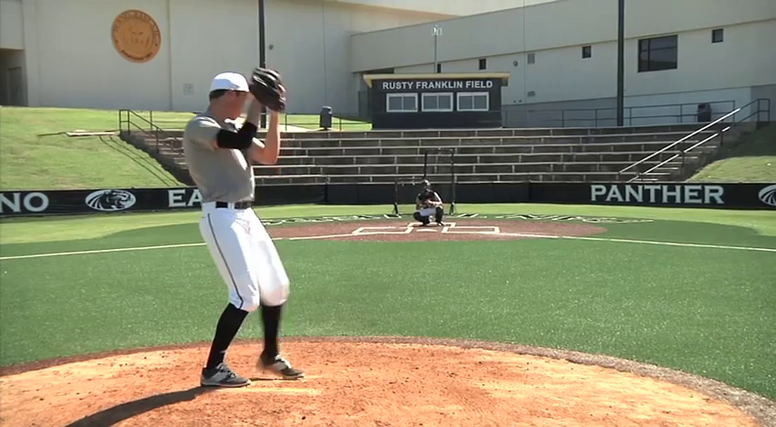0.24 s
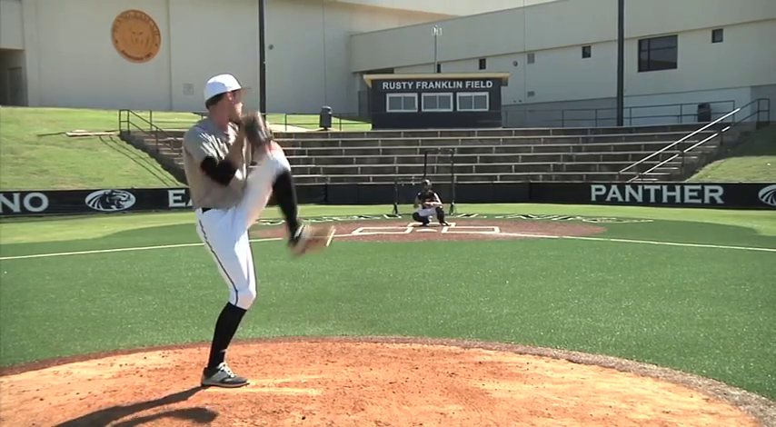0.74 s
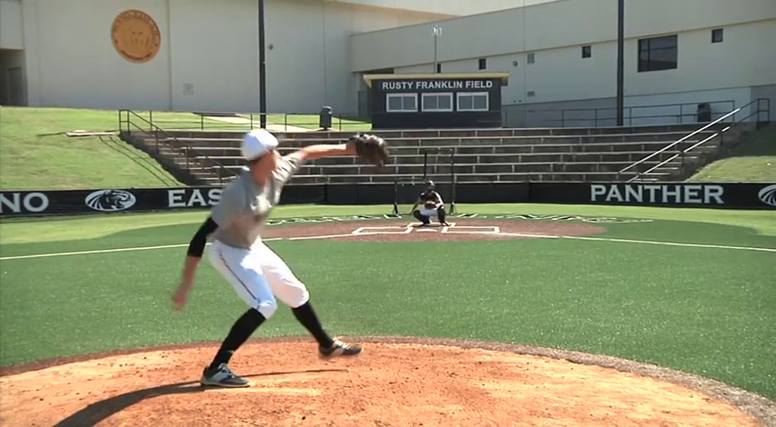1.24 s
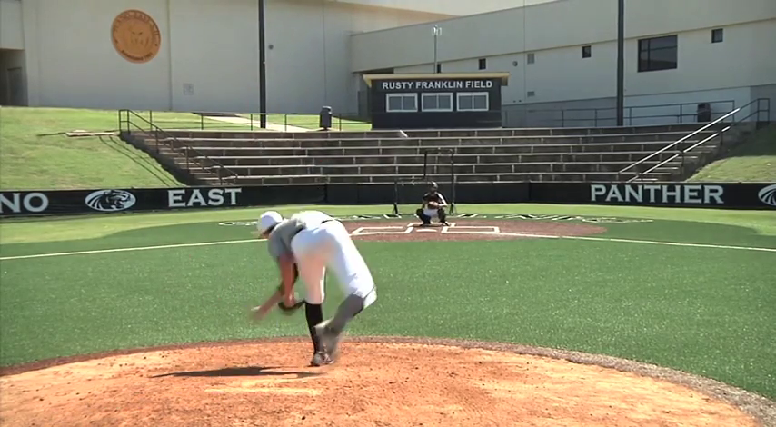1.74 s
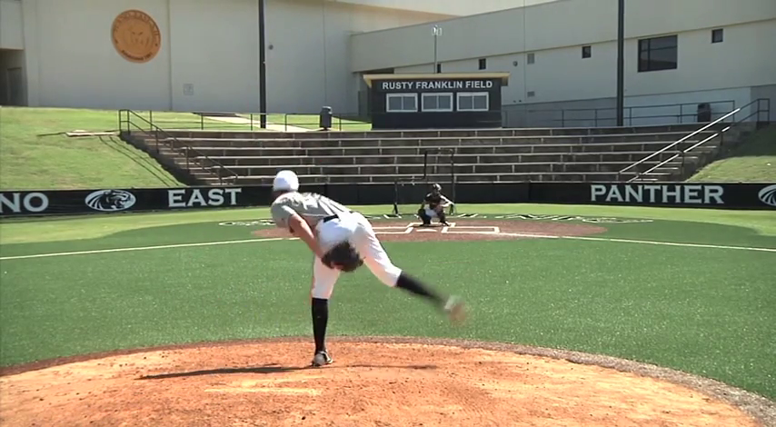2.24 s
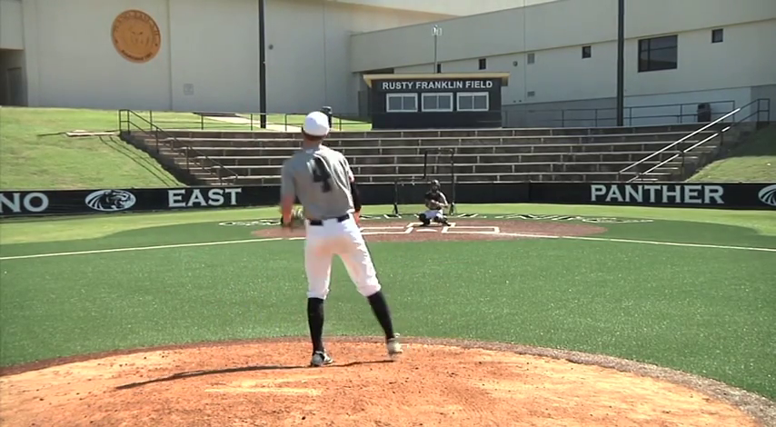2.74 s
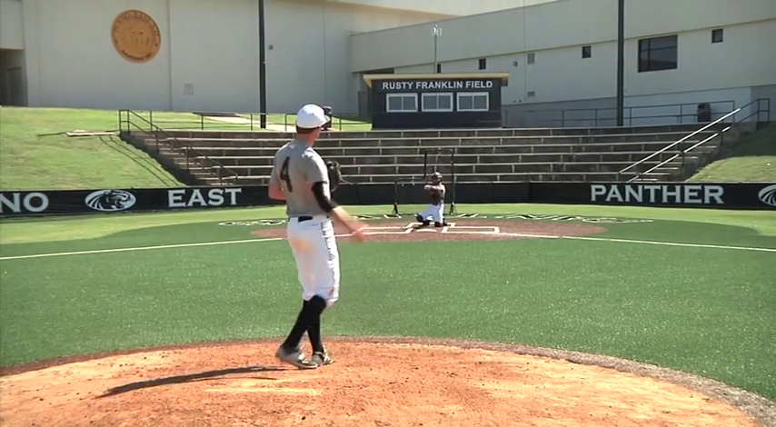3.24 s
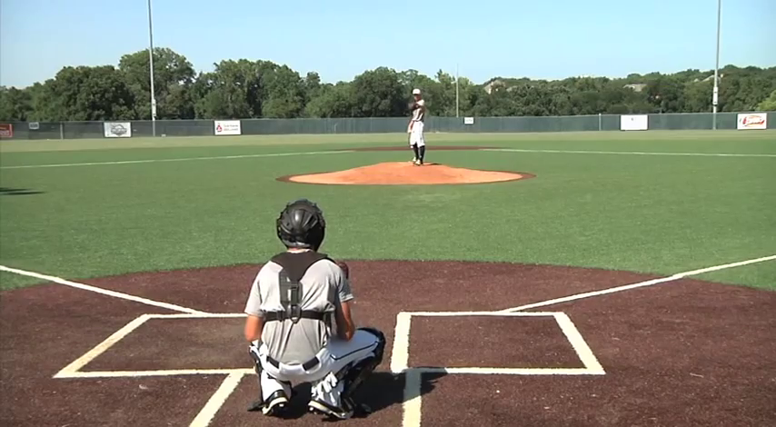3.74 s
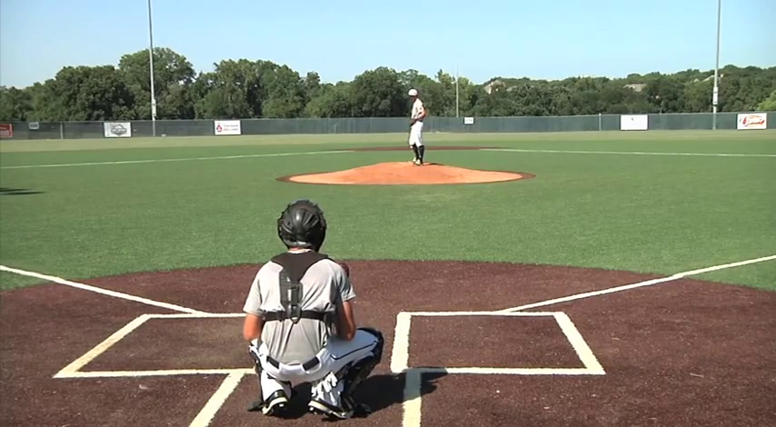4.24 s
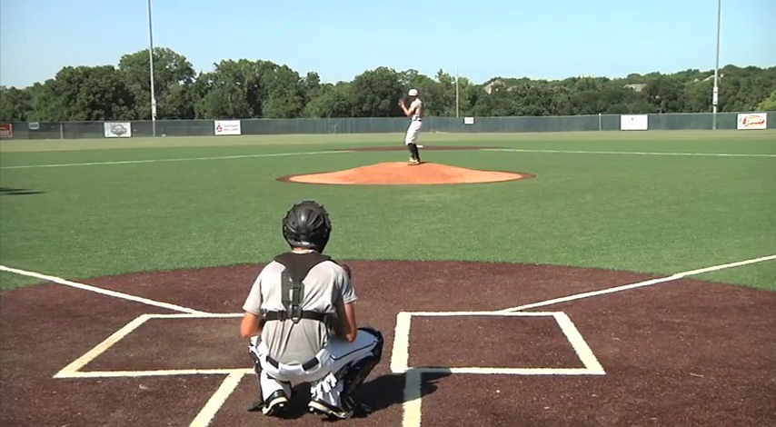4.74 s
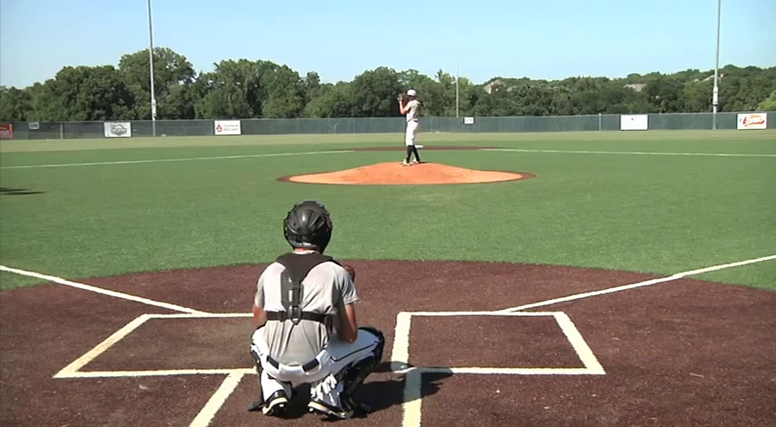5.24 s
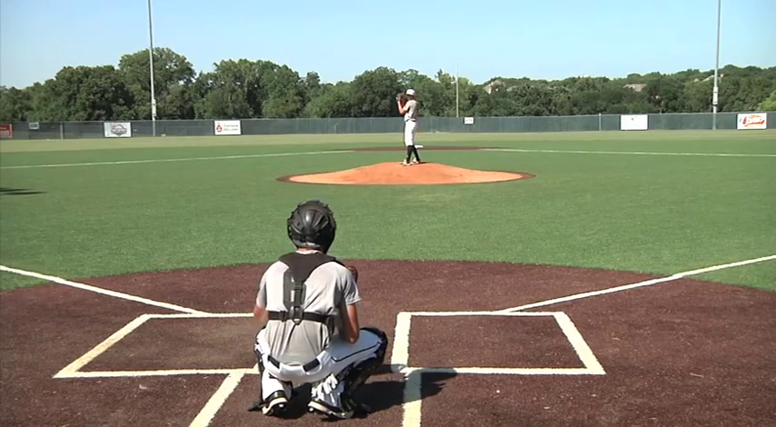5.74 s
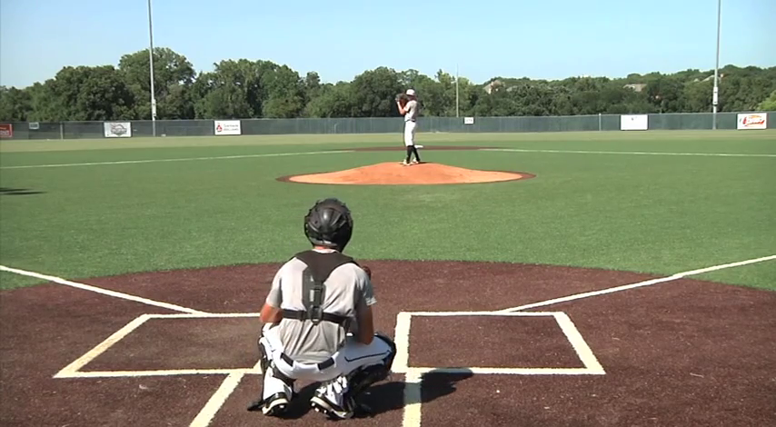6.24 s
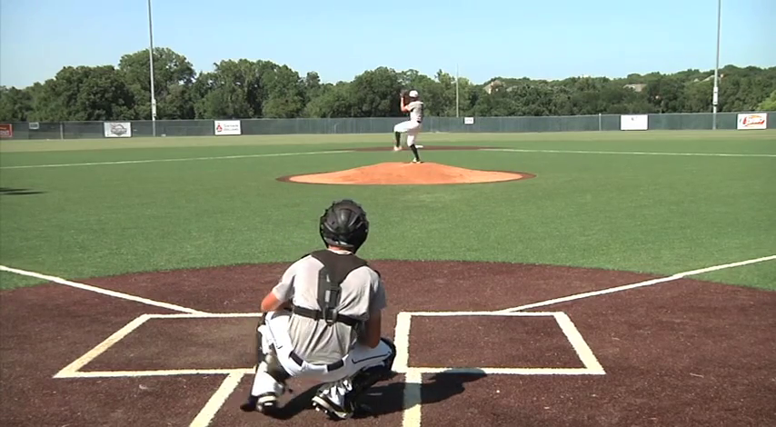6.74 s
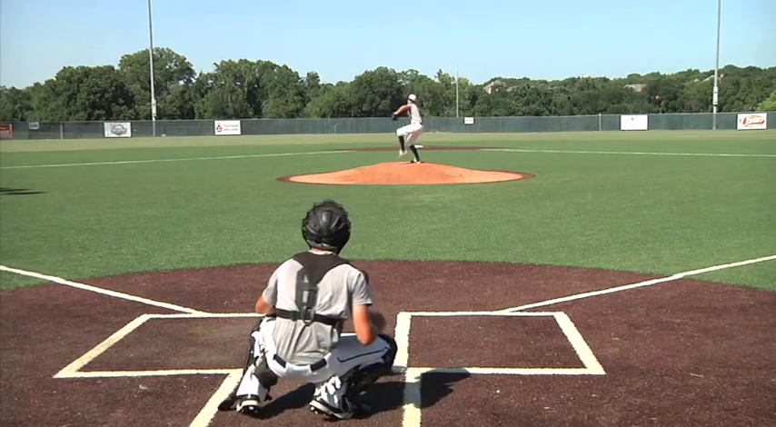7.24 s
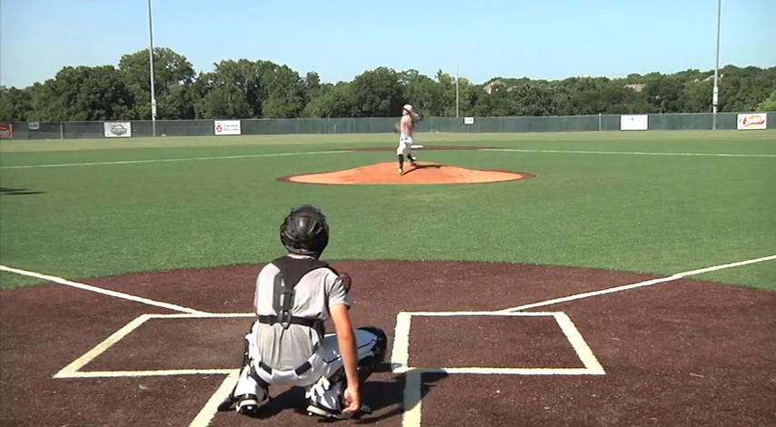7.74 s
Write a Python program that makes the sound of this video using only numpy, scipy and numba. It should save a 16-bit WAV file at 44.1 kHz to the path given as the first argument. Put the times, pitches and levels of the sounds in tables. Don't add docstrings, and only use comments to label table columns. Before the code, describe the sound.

Wind overloads a single, nearly centred microphone in dense booming buffets, with tiny ticks as its level pumps. Beneath lie far traffic, a faint fan whine and a thin insect buzz. Shoes scrape gritty dirt, a hard leathery pop rings out with short echoes, and more gusts arrive. After a sudden cut the air is quieter, a steady distant motor drone and low wind, ending with leather creaks and a rising gust.

```python
import sys
import numpy as np
from scipy import signal
from scipy.fft import rfft, irfft, next_fast_len
from scipy.io import wavfile
from scipy.ndimage import uniform_filter1d
from numba import njit

SR = 44100
rng = np.random.default_rng(int(sys.argv[2]) if len(sys.argv) > 2 else 0)


def store_wav(level_fs):
    pcm = np.round(np.clip(np.atleast_2d(level_fs), -1, 1) * 32767)
    wavfile.write(sys.argv[1], SR, pcm.T.astype(np.int16))


def ratio_of_db(decibels):
    return 10 ** (np.asarray(decibels, float) / 20)


N = 351918
CHANGE_S = 3.4427
LIMIT = .447


def evened(x):
    return x / np.sqrt(np.mean(x ** 2) + 1e-20)


def read(points, hz):
    f, value = np.transpose(points)
    return np.interp(np.log(hz + 1), np.log(f + 1), value)


def curve(rows, index):
    rows = np.array(rows)
    return np.interp(np.arange(N) / SR, rows[:, 0], rows[:, index])


def add(mix, s, sound):
    part = mix[max(round(s * SR), 0):][:len(sound)]
    part += sound[:len(part)]


def coloured(x, points):
    size = next_fast_len(len(x))
    gain = ratio_of_db(read(points, np.fft.rfftfreq(size, 1 / SR)))
    return evened(irfft(rfft(x, size) * gain, size)[:len(x)])


def drift(seconds):
    t = np.arange(0, N / SR, 1e-3)
    size = max(round(seconds * 1000), 2)
    smooth = uniform_filter1d(rng.standard_normal(len(t)), size)
    smooth = uniform_filter1d(smooth, size)
    return np.interp(np.arange(N) / SR, t, evened(smooth))


def resonate(x, hz, width):
    r = np.exp(-np.pi * width / SR)
    return 2 * signal.lfilter([1 - r], [1, -r * np.exp(2j * np.pi * hz / SR)], x).real


def slow_gain_db():
    # [t/s, gain/dB]
    slow_points = [(0.0, -8), (0.22, -10), (0.4, -8.5), (0.8, -6.5), (1.12, -12.5), (1.5, -2.5), (2.0, -4),
                   (2.5, -2), (2.95, -8.5), (3.3, -3.5), (3.43, -3.5), (3.47, 0.3), (3.9, 0.5), (5.0, 0.13),
                   (6.85, .7), (7.3, -0.95), (7.98, 1)]
    return curve(slow_points, index=1)


def wind():
    # [t/s, level/dB, brightness/dB]
    gusts = [(0.0, -14.5, -20), (0.5, -10, -28), (0.7, -12.5, -12), (1.65, -13, -10), (2.15, -14.5, -14),
             (2.3, -20.5, -26), (2.5, -12, -22), (3.0, -14, -17), (3.44, -11.5, -12), (3.85, -22, -28),
             (4.15, -15.5, -31), (4.35, -27, -16), (4.64, -13.5, -33), (4.9, -30, -15),
             (6.38, -37.5, -10.5), (6.64, -24, -10.5), (7.1, -22, -24.5), (7.8, -12, -20.5)]
    # [f/Hz, density/dB]
    turbulence = [(2.9, -37.5), (5.0, 0.5), (18, 4), (36, -3.5), (124, -18.5), (330, -43.5), (430, -63.5),
                  (730, -120)]
    # [t/s, direction +-1, peak over the limit/dB, width/ms]
    buffets = [(0.018, 1, -0.1, 12), (0.039, -1, 2.5, 19), (0.098, -1, 1, 10), (0.135, 1, 0.2, 20),
               (0.155, -1, 3, 23), (0.378, -1, 2, 14.3), (0.404, 1, 3, 9.9), (0.427, 1, 2, 13),
               (0.567, 1, 0.5, 13), (0.723, 1, 1.3, 14), (0.745, -1, 0.5, 11), (0.854, 1, 0, 7.9),
               (0.868, -1, -0.5, 13), (0.991, 1, -0.3, 12), (1.012, -1, 0.2, 12), (1.034, -1, 1.8, 6),
               (1.441, -1, -0.5, 8), (1.641, 1, -0.9, 11), (1.839, 1, 1.5, 9), (2.499, -1, 3.5, 20),
               (2.668, -1, 1.5, 13), (2.773, -1, 0.5, 17), (2.817, 1, 1.5, 10), (2.876, -1, 3, 16),
               (2.935, 1, 1.64, 14), (3.041, -1, 1.5, 12), (3.375, -1, 0.5, 8.5), (3.435, -1, -0.04, 19),
               (7.844, 1, 0.7, 17), (7.943, 1, -3, 23)]
    rumble = coloured(rng.standard_normal(N), turbulence)
    flutter = signal.sosfiltfilt(signal.butter(2, 55, "high", fs=SR, output="sos"), rumble)
    bright_db = curve(gusts, index=2) + 15
    x = rumble - flutter + flutter * ratio_of_db(bright_db + 2.3 * drift(0.045) + 1.7 * drift(0.17))
    x *= ratio_of_db(curve(gusts, index=1) - 0.3 + 1.3 * drift(0.13))
    x = .4 * np.tanh(x / .4)
    for s, way, db, ms in buffets:
        here = x[round(s * SR)]
        push = np.hanning(round(ms * SR / 600)) ** .8
        peak = np.sign(way) * LIMIT * ratio_of_db(1.3 * db + 0.48)
        add(x, s - ms / 1200, (peak - here) * push)
    return x


def hum():
    # [f/Hz, density/dB]
    mound_colour = [(120, -28), (200, -1.5), (299, -9), (529, -9.5), (935, -14.5), (1260, -17), (1960, -24),
                    (2090, -24.5), (2690, -24), (2930, -23.5), (4300, -33.5), (7110, -41), (11000, -59.5),
                    (14300, -88), (22000, -120)]
    # [f/Hz, density/dB]
    plate_colour = [(35, -47), (100, -7), (190, 2.5), (440, -3), (550, -6.5), (860, -8), (1300, -15),
                    (2100, -24), (3400, -25.5), (4300, -33.5), (5500, -39.5), (7500, -40.5), (8800, -48),
                    (10000, -55)]
    # [f/Hz, width/Hz, level/dB]
    fan_tones = [(2090, 15, -3.5), (2440, 55, -2), (3096, 23, -1.5), (3600, 30, -6)]
    # [t/s, level over the hum/dB]
    fan_swells = [(0, -23), (.3, -11.5), (.8, -22), (1.2, -49), (1.9, -15), (2.3, -13), (2.7, -20),
                  (3.4, -17)]
    # [f/Hz, width/Hz, level over the hum/dB]
    motor_tones = [(534, 1.6, -8.5), (1058, 1.5, -14)]
    # [t/s, level over the hum/dB]
    insect_swells = [(0, -45), (.2, -42), (.28, -22), (.75, -26), (.85, -42), (3.4, -38)]
    patchy = ratio_of_db(0.45 * drift(0.038))
    mound = coloured(rng.standard_normal(N), mound_colour) * ratio_of_db(3.5)
    noise = rng.standard_normal(N)
    whine = sum(ratio_of_db(db) * evened(resonate(noise, hz, width)) for hz, width, db in fan_tones)
    mound += whine * ratio_of_db(curve(fan_swells, index=1) + 1.5 * drift(.04))
    mound += sum(ratio_of_db(db) * evened(resonate(noise, hz, width)) for hz, width, db in motor_tones)
    mound += evened(resonate(noise, 3560, 45)) * ratio_of_db(curve(insect_swells, index=1))
    plate = coloured(rng.standard_normal(N), plate_colour) * ratio_of_db(3.5)
    plate += ratio_of_db(-11.5) * evened(resonate(noise, 440, 4.0))
    return ratio_of_db(-41) * patchy * np.where(np.arange(N) < CHANGE_S * SR, mound, plate)


def bird():
    # [t/s, length/s, f/Hz, level/dB]
    whistles = [
        (0.96, 0.028, 7350, -68),
        (1.1, 0.2, 6800, -75),
        (2.705, 0.32, 7030, -63.5),
    ]
    sag_hz, sag_s, fade_db = 300, .09, -8
    out, tremble = np.zeros(N), ratio_of_db(3.6 * drift(.02))
    for s, length, hz, db in whistles:
        t = np.arange(0, length, 1 / SR)
        pitch = hz - sag_hz * (1 - np.exp(-t / sag_s))
        tone = np.sqrt(2) * np.sin(2 * np.pi * np.cumsum(pitch) / SR)
        add(out, s, tone * ratio_of_db(db + fade_db * t / length) * signal.windows.tukey(len(t), .25))
    return out * tremble


def scuffs():
    # [start t/s, loudest t/s, end t/s, peak level/dB, weight of the foot/dB]
    drags = [
        (1.3, 1.4, 1.5, -49.5, 4),
        (1.5, 1.563, 1.615, -36.5, 0),
        (1.655, 1.662, 1.7, -44, -2),
        (1.67, 1.72, 1.8, -46.5, -11),
        (3.282, 3.286, 3.32, -61, 18),
        (3.3, 3.335, 3.37, -63, 24),
        (7.66, 7.76, 7.86, -58, 6),
        (7.858, 7.875, 7.9, -44, 2),
        (7.89, 7.91, 7.975, -49.5, 0),
    ]
    # [t/s, peak level/dB, f/Hz]
    crunches = [(1.408, -39, 2920), (1.511, -45, 6000), (1.518, -34, 4500), (1.538, -23, 650),
                (1.552, -25, 500), (1.549, -28, 2520), (1.661, -23.5, 600), (1.731, -34, 2500),
                (1.731, -44, 6500), (3.286, -26, 1100), (3.286, -39, 2800), (3.291, -43, 2300),
                (3.33, -26, 1100), (7.867, -40, 4950), (7.885, -26, 5900), (7.97, -39, 2500)]
    # [f/Hz, density/dB]
    sand_colour = [(710, -33), (1200, -12), (1710, 2), (2290, -0.5), (3430, -4.5), (8570, -18),
                   (12000, -34), (15600, -70), (22000, -120)]
    # [f/Hz, density/dB]
    glove_colour = [(1000, -30), (2000, -0.5), (4500, -7), (7000, -10.5), (9000, -14), (11500, -44),
                    (16000, -72)]
    swell_db, fade_db = -12.5, -8.5
    out = np.zeros(N)
    grains = ratio_of_db(1.3 * rng.exponential(1, N)) * (rng.random(N) < .03)
    sand = rng.standard_normal(N) * (1 + grains)
    dull = resonate(resonate(sand, 800, 800), 800, 800)
    for *s, db, weight_db in drags:
        level_db = [db + swell_db, db, db + fade_db]
        t = np.arange(s[0], s[-1], 1 / SR)
        at = slice(round(s[0] * SR), round(s[0] * SR) + len(t))
        grit = coloured(sand[at], sand_colour if s[0] < CHANGE_S else glove_colour)
        scrape = evened(dull[at]) * ratio_of_db(weight_db - 2.0)
        swell = ratio_of_db(np.interp(t, s, level_db) - 1.0) * signal.windows.tukey(len(t), .15)
        add(out, s[0], (grit + scrape) * swell)
    t = np.arange(600) / SR
    for s, db, hz in crunches:
        burst = rng.standard_normal(len(t)) * ratio_of_db(-60 * t / 0.02) * np.minimum(t * 1500, 1)
        ring = resonate(resonate(burst, hz, .7 * hz), hz, .7 * hz)
        add(out, s, ratio_of_db(db) * ring / abs(ring).max())
    return signal.sosfilt(signal.butter(4, 10000, fs=SR, output="sos"), out)


def mitt():
    # [f/Hz, level/dB, delay/s, length/s]
    pocket = [
        (330, 0.5, 0.00065, 0.006),
        (707, -3, 0.00018, 0.0028),
    ]
    # [t/s, crack level/dB,
    # low thump level/dB, high thump level/dB, loss of treble/dB per half octave]
    pops = [(2.2918, -24, -44, -44, -1), (2.2927, -4.5, -9, -0.5, 1.5), (2.3135, -46, -42, -51, 10),
            (2.3242, -36, -44, -44, 6), (2.329, -40, -49, -42, 1), (2.3452, -13.5, -15.5, -22, -5),
            (2.3535, -14.5, -14.5, -16.5, 1.5), (2.368, -37, -26, -46, 3), (2.386, -43, -29, -41, 10),
            (2.4101, -23.5, -32, -19.5, 6), (2.417, -27, -31, -31, 5), (2.424, -36, -32, -40, 5),
            (2.430, -31, -45, -19, 12), (2.438, -28, -41, -28, 12), (2.445, -33, -34, -32, 19),
            (2.451, -35, -22.5, -21.5, 15)]
    # [f/Hz, density/dB]
    slap_colour = [(700, -32), (1000, -29), (1400, -9), (1900, -6), (2400, -3.5), (2800, 0.5), (3250, 6.5),
                   (3900, -18.5), (4600, -7.5), (6700, -11), (8600, -12.5), (10500, -36), (15500, -37)]
    slap_ms, smear_ms_per_s = 11.7, 52
    pop_s = pops[1][0]
    out, t = np.zeros(N), np.arange(3000) / SR
    thumps = []
    for hz, db, late, length in pocket:
        wave = np.sin(2 * np.pi * hz * np.maximum(t - late, 0))
        thumps.append(ratio_of_db(db) * wave * np.exp(-(t / length) ** 4))
    low, high = thumps
    for s, crack_db, low_db, high_db, loss_db in pops:
        ms = slap_ms + smear_ms_per_s * (s - pop_s)
        knee_hz = 3600 - 120 * loss_db
        dulled = [(hz, db - loss_db * max(np.log2(hz / knee_hz), 0) * 2) for hz, db in slap_colour]
        slap = coloured(rng.standard_normal(len(t)), dulled)
        ring = signal.sosfiltfilt(signal.butter(2, 5500, fs=SR, output="sos"), slap)
        slap = ring * ratio_of_db(-60 * t / ms * 1000) + (slap - ring) * ratio_of_db(-60 * t / ms * 2200)
        onset = np.minimum(t / (0.000054 + 0.000077 * abs(loss_db)), 1)
        add(out, s, ratio_of_db(crack_db) * slap * onset + ratio_of_db(low_db) * low + ratio_of_db(high_db) * high)
    tail = np.arange(SR // 2) / SR
    field = rng.standard_normal(len(tail)) * ratio_of_db(-60 * tail / 1.4) * np.minimum(tail / 0.11, 1)
    add(out, pop_s, ratio_of_db(-52) * signal.oaconvolve(field, out[round(pop_s * SR):][:600]))
    return out


def scene():
    near = (wind() + bird() + scuffs() + mitt()) / ratio_of_db(slow_gain_db())
    return np.array([near + hum()] * 2)


@njit
def stepped_db(x, slow_db, limit, step, every, quick, hold):
    out, steps, last, owed = np.zeros(len(x)), round(slow_db[0] / step), -hold, 0
    for i in range(len(x)):
        if abs(x[i]) * 10 ** (steps * step / 20) > limit and i - last > quick:
            steps, last, owed = steps - 1, i, 5
        elif i % every == 0:
            want = slow_db[i] / step - steps
            if owed > 0 and i - last > every // 2:
                steps, owed = steps - 1, owed - 1
            elif want < -.6:
                steps -= 1
            elif want > .6 and i - last > hold and i % (4 * every) == 0:
                steps += 1
        out[i] = steps * step
    return out


def roll_off(x):
    return signal.sosfilt(signal.butter(12, 16540, fs=SR, output="sos"), x)


def record(dry):
    # [t/s, level/dB]
    ticks = [(0.0917, -39), (0.423, -41), (0.5611, -42), (0.7372, -44), (0.987, -40), (1.004, -40),
             (1.1016, -45.5), (3.3712, -47)]
    gain_db = stepped_db(dry[0], slow_gain_db(), LIMIT, step=.3, every=66, quick=4, hold=330)
    mono = dry[0] * ratio_of_db(gain_db)
    for s, db in ticks:
        add(mono, s + 0.00089, ratio_of_db(db + 11) * np.array([1, -.6]))
    change = round(CHANGE_S * SR)
    ramp = np.exp(np.arange(-600, 0) / SR / 0.0013)
    mono[change - 600:change] += -.2 * np.sign(mono[change]) * ramp
    right_db = -1.27
    x = np.clip(mono * ratio_of_db(np.array([[0], [right_db]])), -.46, .46)
    x += ratio_of_db(-80) * rng.standard_normal((2, N)) + ratio_of_db(-96.5) * rng.standard_normal(N)
    x -= .97 * signal.sosfiltfilt(signal.butter(10, 15850, "high", fs=SR, output="sos"), x)
    return roll_off(x)


dry = scene()
out = record(dry)
store_wav(out)
```